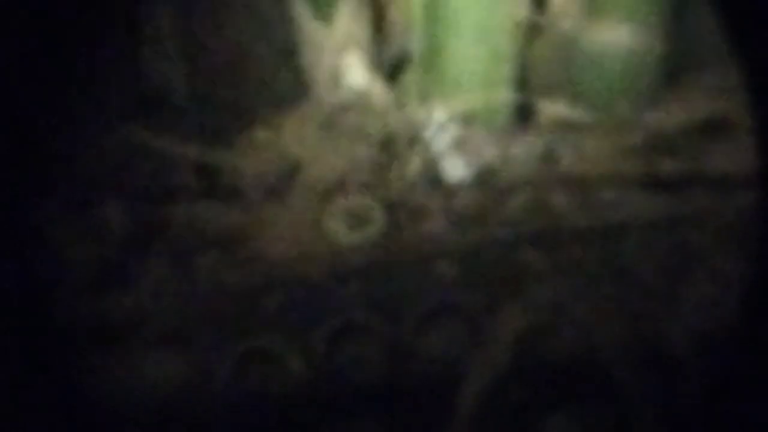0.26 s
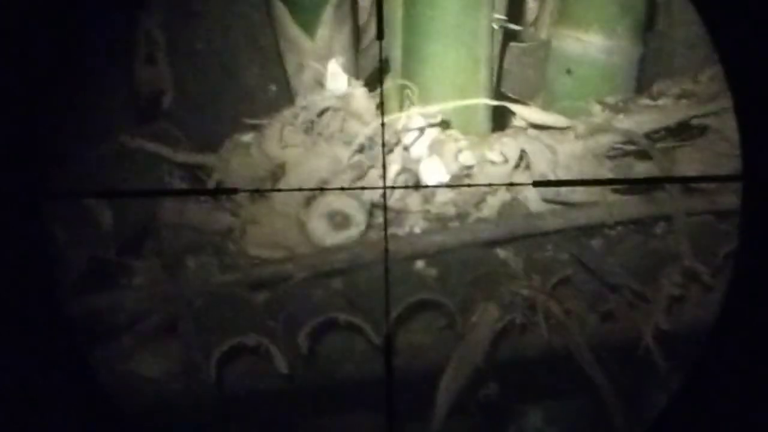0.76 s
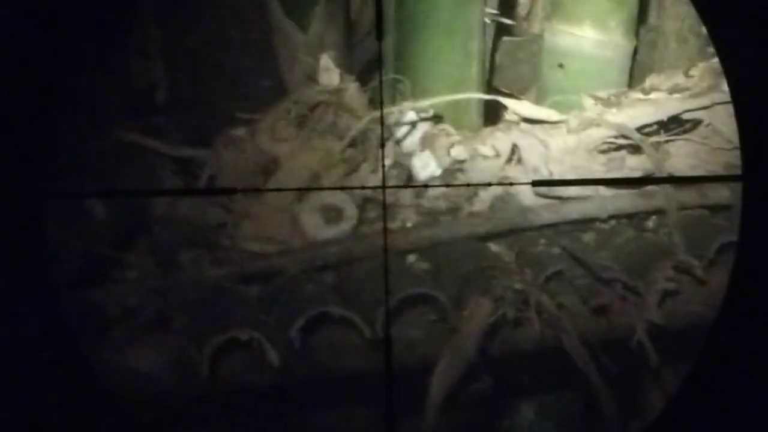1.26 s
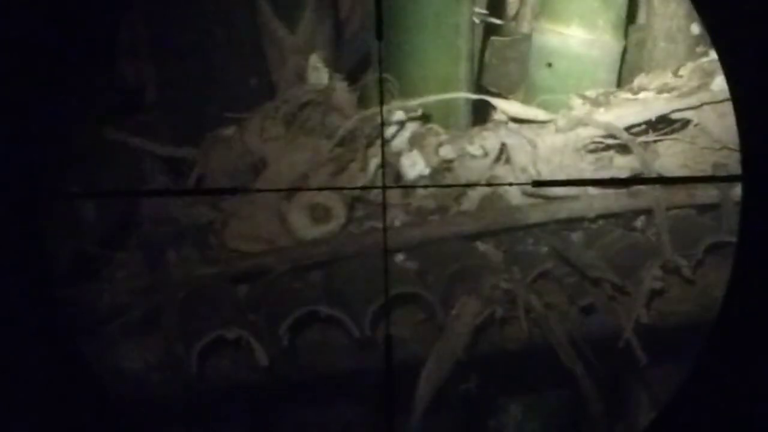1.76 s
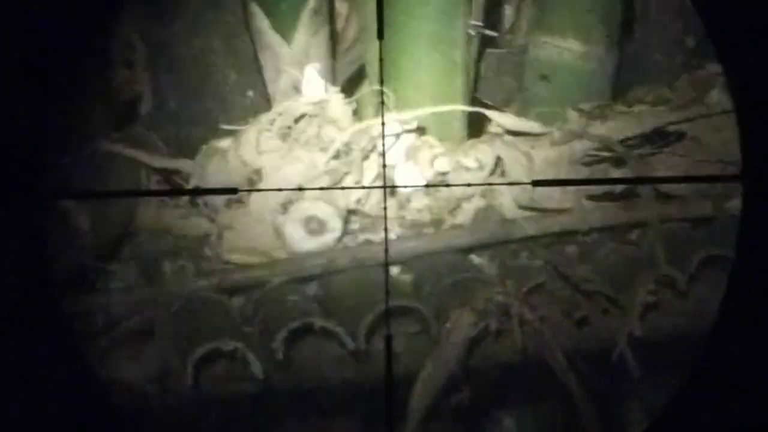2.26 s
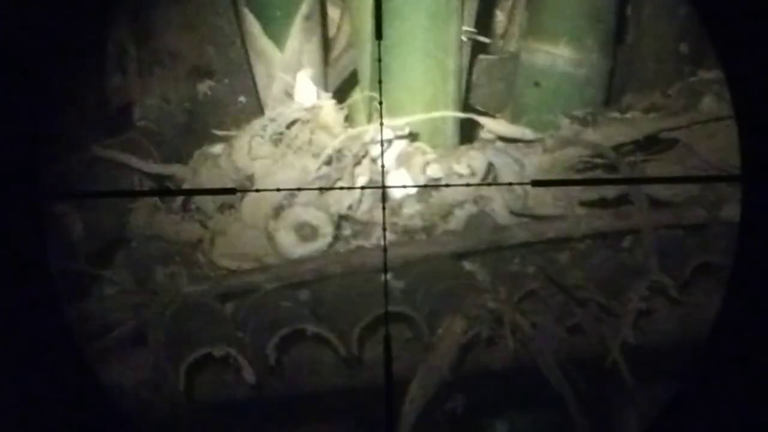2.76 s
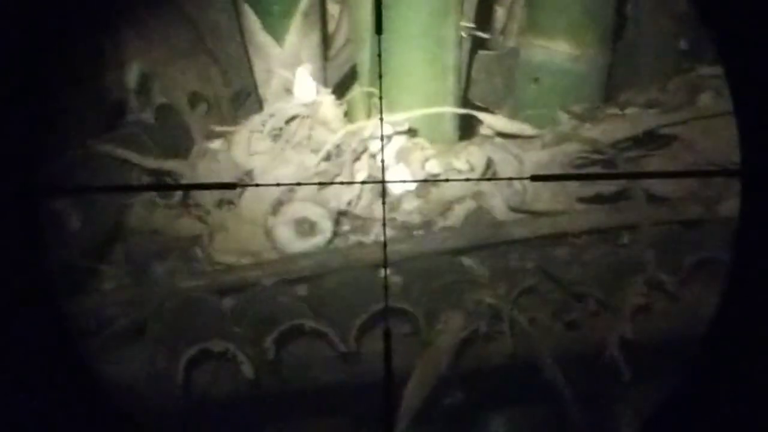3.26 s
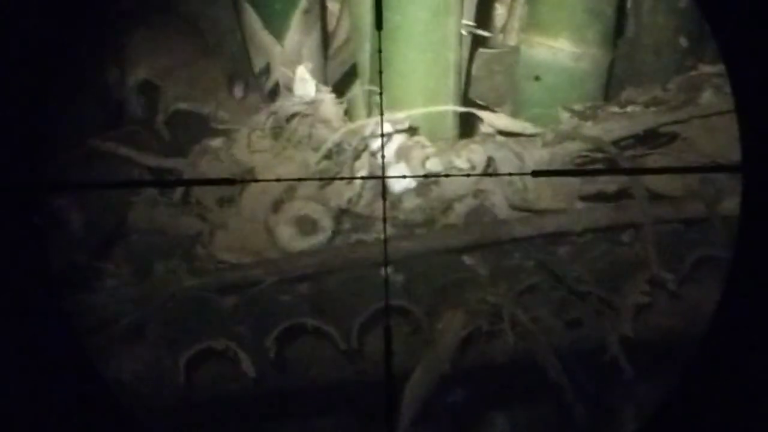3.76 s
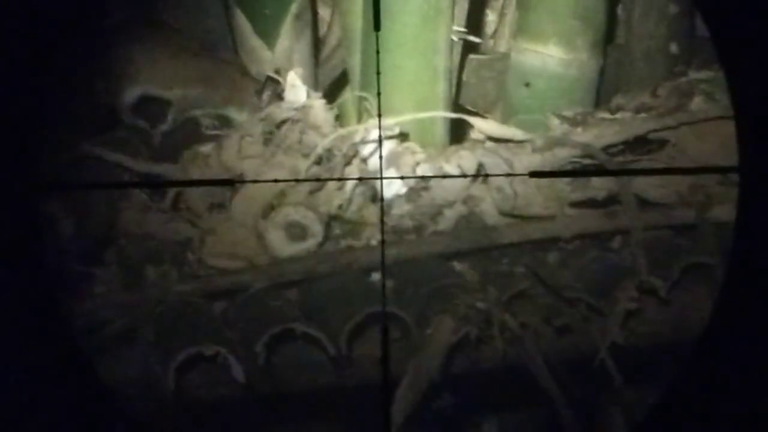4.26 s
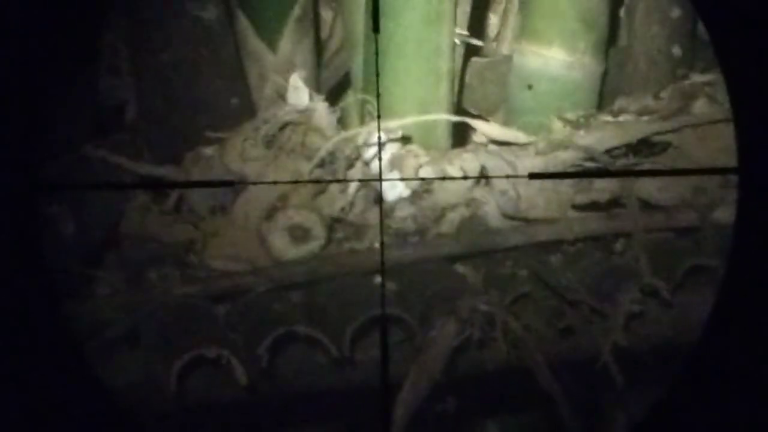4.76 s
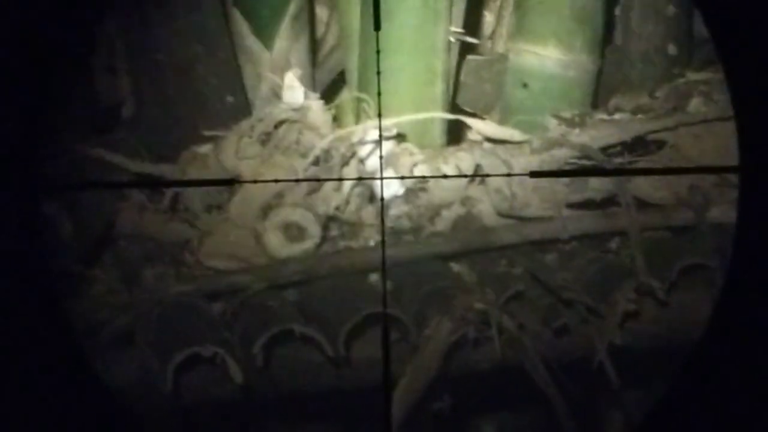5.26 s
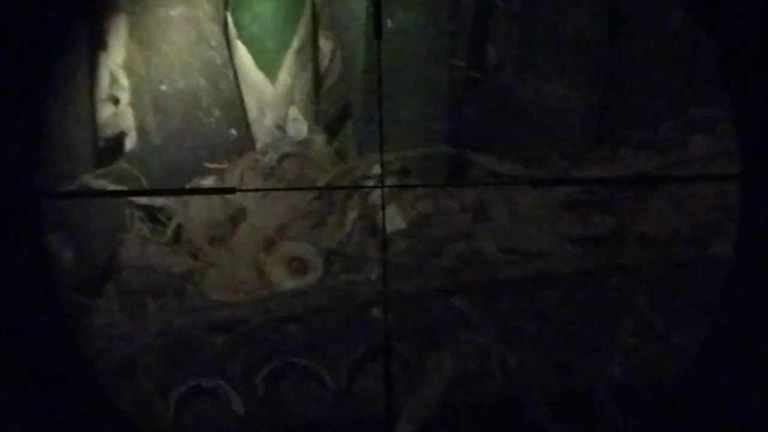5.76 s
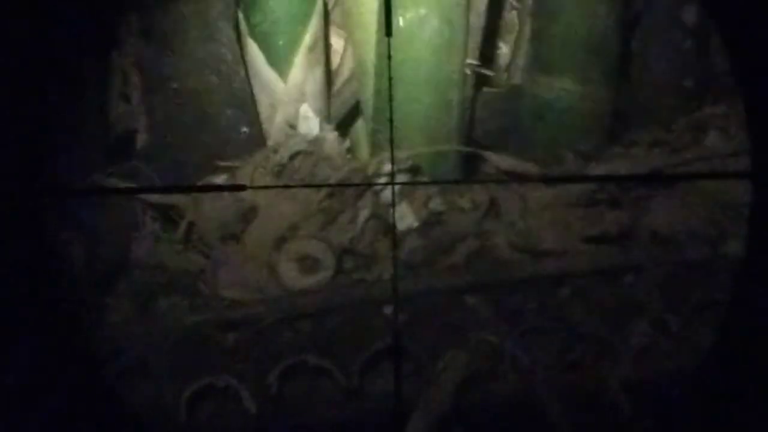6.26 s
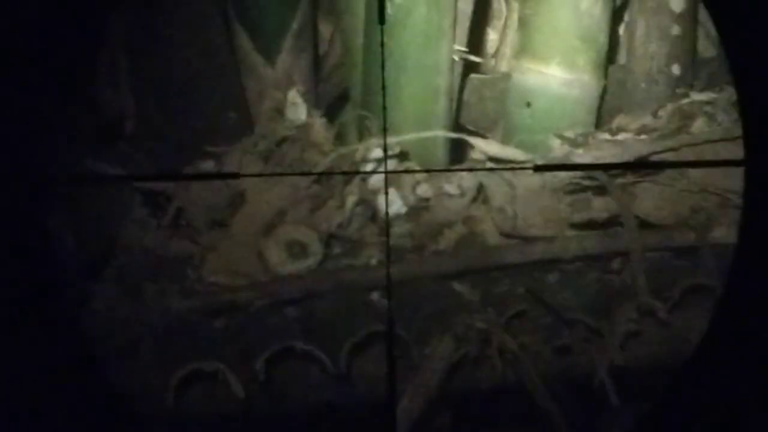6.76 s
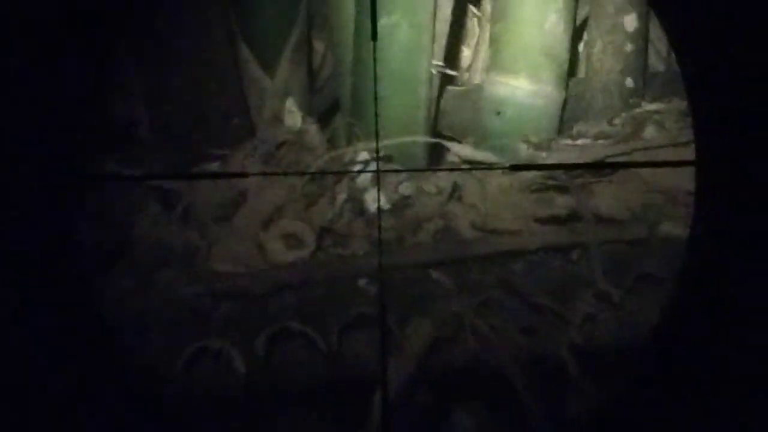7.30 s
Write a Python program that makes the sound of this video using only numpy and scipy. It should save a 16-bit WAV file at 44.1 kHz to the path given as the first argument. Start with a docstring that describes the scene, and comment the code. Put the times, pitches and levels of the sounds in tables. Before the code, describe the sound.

Night insects fill a still bamboo grove with a thin high buzz, quiet cricket trills and a far, pulsing chorus. Two nearby katydids rasp high and steadily over it, roughly twice a second, slipping in and out of step. Faint knocks occur close to the microphone early on. About three quarters through, an air gun gives one brief muffled pop, followed by another light knock as the chirping continues.

```python
"""Night in a bamboo grove. From the start, over still air, an insect's wing clicks sustain a thin high
buzz, crickets trill low and a far katydid chorus swells. A faint knock sounds close by; then two near
katydids rasp about twice a second, scraper on file, their wings now and then giving a brief lower ring.
The pair meet near 1.9 s and slowly fall out of step. A few more knocks come, the sharpest near 5.7 s,
a short muffled pop like an air-gun shot."""
import sys
import numpy as np
from scipy import signal
from scipy.fft import rfft, irfft
from scipy.io import wavfile

SR = 44100
rng = np.random.default_rng(int(sys.argv[2]) if len(sys.argv) > 2 else 0)


def put_to_file(sound):
    """Save the sound as 16-bit audio at rate SR, in the file named by the first command-line argument."""
    columns = np.atleast_2d(sound).T  # one column per channel
    safe = np.clip(columns, -1, 1)
    whole_steps = np.round(safe * 32767)
    wavfile.write(sys.argv[1], SR, whole_steps.astype(np.int16))


N = 332073
T = np.arange(N) / SR

def undb(db):
    """Amplitude ratio of a level in decibels."""
    return 10 ** (np.asarray(db) / 20)

def unit(x):
    """Normalisation to an rms of one."""
    return x / np.sqrt(np.mean(x ** 2))

def add(track, start_s, sound):
    """Superposition of a short sound on a track."""
    i = int(np.clip(start_s * SR, 0, N))
    track[i:i + len(sound)] += sound[:N - i]

def colour(x, spectrum, size=8192):
    """Minimum-phase filtering at unit power through (frequency [Hz], level [dB]) points."""
    hz, db = np.transpose(spectrum)
    bin_hz = np.arange(size // 2 + 1) * SR / size
    gain = undb(np.interp(np.log(bin_hz + 1), np.log(hz), db))
    cepstrum = irfft(np.log(gain))
    cepstrum[1:size // 2] *= 2
    cepstrum[size // 2 + 1:] = 0
    response = irfft(np.exp(rfft(cepstrum)))
    return signal.fftconvolve(x, response / np.linalg.norm(response))[:N]

def walk(rate):
    """Slow random modulation of unit rms, with rate new values a second."""
    return unit(np.interp(T * rate, np.arange(N), rng.standard_normal(N)))

def teeth(rate):
    """Shot noise: equal clicks at random times, as of a scraper catching file teeth."""
    caught = rng.random(N) < rate / SR
    return unit(caught * rng.choice([-1, 1], N))

def swell(t, hold_s, rise_db_per_s, fall_db_per_s):
    """Exponential growth and decay, in dB: the level rises until t = 0, holds, then falls."""
    return rise_db_per_s * np.minimum(t, 0) - fall_db_per_s * np.maximum(t - hold_s, 0)

def pip(hz, sag_hz, along):
    """Frequency glide: a sine sags in pitch while along runs from 0 to 1."""
    return np.sin(2 * np.pi * np.cumsum(hz + sag_hz * (.5 - along)) / SR)

def notes(table, length_s, sag_hz):
    """Tone bursts: each glide sounds under a half-sine envelope."""
    out, along = np.zeros(N), np.minimum(T[:SR // 30] / length_s, 1)
    for start, hz, db in table:
        add(out, start, undb(db) * np.sin(np.pi * along) * pip(hz, sag_hz, along))
    return out

# Background spectrum: (frequency [Hz], relative level [dB])
NIGHT_SPECTRUM = [(25, -49), (45, -27), (65, -23), (100, -11.5), (200, -16), (290, 0.5), (450, -2.5),
                  (700, -5), (1400, -8.5), (2600, -0.5), (3600, -3.5), (4700, 2), (6600, -4), (8600, -5),
                  (10500, -60), (15000, -40)]
def night_air():
    """Incoherent summation: still air and countless distant insects merge into coloured noise."""
    return undb(-63 + .8 * walk(7)) * colour(rng.standard_normal(N), NIGHT_SPECTRUM)

def high_buzz(centre_hz=7725, throb_s=.3225, crest_s=.243):
    """Resonance: dense wing clicks ring one high mode, louder and higher at each crest of a throb."""
    throb = np.cos(2 * np.pi * (T - crest_s) / throb_s)
    hz = centre_hz + 60.3 * throb + 44.87 * walk(12)
    sway_db = 1.5 * throb + 1.34 * walk(12)
    carrier = np.exp(2j * np.pi * np.cumsum(hz) / SR)
    out = np.zeros(N)
    for width_hz, db in [(690, -62), (104, -64)]:  # broad skirt, narrow core
        lowpass = signal.butter(3, width_hz / 2, fs=SR, output="sos")
        envelope = signal.sosfilt(lowpass, teeth(5000) + 1j * teeth(5000))
        out += undb(db + sway_db) * unit((envelope * carrier).real)
    return out

# One trill per cricket: (frequency [Hz], pulse rate [1/s], level [dB], unevenness [dB])
CRICKET_TRILLS = [(2483, 17, -67, 0.5), (2505, 37, -66, 3.5), (2576, 38.5, -70.5, 4)]
# Loudest pulses of the nearest cricket: (time [s], frequency [Hz], level [dB])
LOUD_PULSES = [(.747, 2525, -48.5), (1.658, 2455, -49.5), (1.83, 2490, -53), (2.314, 2487, -48.5),
               (2.457, 2490, -47.5), (3.997, 2503, -50), (4.58, 2515, -51), (5.624, 2500, -46.5),
               (7.096, 2460, -49), (7.302, 2510, -47.5)]
def crickets(pulse_s=.014, jitter=.09, waver_hz=32.06, phrase_db=1.23):
    """Amplitude modulation: nearly pure, wavering tones are cut into slightly uneven pulses."""
    out = np.zeros(N)
    pulse = np.sin(np.pi * np.minimum(T[:SR // 30] / pulse_s, 1))
    for hz, rate, db, uneven_db in CRICKET_TRILLS:
        envelope = np.zeros(N)
        slips, sizes = rng.standard_normal((320, 2)).T
        times = np.cumsum(1 + jitter * slips) / rate
        for start, size in zip(times - times[0], sizes):
            add(envelope, start, undb(uneven_db * min(size, 1.8)) * pulse)
        envelope *= undb(phrase_db * walk(5.5))
        tone = np.sin(2 * np.pi * np.cumsum(hz + waver_hz * walk(14)) / SR)
        out += undb(db) * unit(envelope * tone)
    return out + notes(LOUD_PULSES, length_s=.011, sag_hz=50)

# Chirps of the far katydids: (crest time [s], hold [s], relative level [dB])
CHORUS_CHIRPS = [(0, .01, -53), (0.315, 0.13, -40), (.92, 0.047, -37), (1.12, .14, -55.5),
                 (1.45, 0.071, -38), (1.69, .19, -53.5), (2.03, 0.04, -40), (2.23, 0.25, -53.5),
                 (2.55, 0.078, -40.5), (2.79, 0.19, -56), (3.09, 0.069, -40), (3.33, 0.025, -55),
                 (3.63, 0.11, -40.5), (4.17, 0.038, -41.5), (4.73, 0.074, -41), (5.27, 0.083, -41.5),
                 (5.81, 0.094, -41.5), (6.38, .07, -40.5), (6.92, .09, -41.5), (7.47, .07, -42)]
# Their spectrum: (frequency [Hz], relative level [dB])
CHORUS_SPECTRUM = [(1200, -44.5), (1950, -27), (2400, -5), (2900, -17), (3600, -16.5), (4350, -3),
                   (4700, 1), (5250, -5.5), (5900, -7), (6500, -11.5), (7400, -10.5), (8600, -27.5),
                   (11800, -53), (15300, -37.5)]
def far_chorus(scatter_lag_s=.17, flutter_db=1.28):
    """Addition of powers: far chirps and the near follower's scattered sound blur into one rasp."""
    scattered = [(start + scatter_lag_s, .1, db - 3) for start, db in FOLLOWER_CHIRPS]
    power = sum(undb(db + swell(T - crest, hold_s, rise_db_per_s=136.5, fall_db_per_s=137.5)) ** 2
                for crest, hold_s, db in list(CHORUS_CHIRPS) + scattered)
    rasp = teeth(4000) * np.sqrt(power) * undb(-7 + flutter_db * walk(110))
    return colour(rasp, CHORUS_SPECTRUM)

# Bands in which a blow's strength is given: (frequency [Hz])
BLOW_BANDS = [150, 430, 800, 1360, 3100]
# Blows: (time [s], then for each of the five bands a relative level [dB])
BLOWS = [(.050, -76, -76, -66, -54, -68), (.566, -83, -66, -61, -51.5, -61),
         (2.196, -88, -74, -62, -66, -80), (5.606, -73, -71, -57, -57, -68),
         (5.665, -71, -60, -54.5, -48, -63), (7.011, -75, -57.5, -60, -58, -59)]
# Modes of the struck body: (frequency [Hz], 60 dB decay time [s], gain [dB])
BODY_MODES = [(72.6, .25, -10), (105, .2, -9), (202, .12, -4.5), (435, 0.074, 3), (812, 0.024, 1.5),
              (1000, 0.013, 2.5), (1386, 0.02, 3), (1780, 0.028, -0.5), (2180, 0.02, 2), (3170, 0.024, 10)]
def knocks(attack_s=.00084):
    """Damped modal vibration: a blow gives a clack in the upper modes, a longer thud in the low ones."""
    out, t = np.zeros(N), T[:SR // 4]
    hz, t60, db = np.transpose(BODY_MODES)[:, :, None]
    for start, *blow_db in BLOWS:
        drive_db = np.interp(np.log(hz), np.log(BLOW_BANDS), blow_db)
        envelopes = undb(db + drive_db) * np.exp(-np.log(1000) * t / t60)
        ring = (envelopes * np.sin(2 * np.pi * (hz * t + rng.random(hz.shape)))).sum(0)
        add(out, start, ring * (1 - np.exp(-t / attack_s)))
    return out

def wing_strokes(count, stroke_s, hurry_s, attack_s, rest_hz, climb_hz, **envelope):
    """A chirp's pulse train, quicker at both ends: (lag [s], relative level [dB], frequency [Hz])."""
    along = np.linspace(0, 1, count)
    lag = np.arange(count) * stroke_s - hurry_s * (2 * along - 1) ** 3
    db = swell(lag - attack_s, **envelope)
    hz = rest_hz + climb_hz * np.sin(np.pi * along ** 1.55)  # an arch with a late crest
    return np.transpose([lag, db, hz])

def stridulate(chirps, strokes, wing, tooth_rate, bite_db, opening_db, uneven_db,
               tone_db, upper_db, sag_hz, spread_hz):
    """Stridulation: closing wings bite, drag on the file and ring a membrane; opening scrapes softly."""
    force, tone, t = np.zeros(N), np.zeros(N), T[:SR // 40]
    onset = np.tanh((t / .0005) ** 2)
    for start, chirp_db in chirps:
        for lag, db, hz in strokes:
            size, detune = rng.standard_normal(2)
            length_s = .0046 * np.exp(lag / .5)  # strokes lengthen through the chirp
            gain = undb(chirp_db + db + uneven_db * size)
            bite = undb(bite_db) * np.exp(-t / .00071)
            closing = gain * (1 + bite) / (1 + (t / length_s) ** 6)
            opening = gain * undb(opening_db) * np.exp(-((t - .013) / .0046) ** 2)
            add(force, start + lag, closing + opening)
            along = np.minimum(t / length_s, 2)
            pitch = hz + spread_hz * detune
            # the strongest strokes also excite a higher membrane mode
            upper = undb(upper_db + db) * pip(1.13 * pitch, sag_hz, along)
            add(tone, start + lag, closing * onset * (pip(pitch, sag_hz, along) + upper))
    return colour(force * teeth(tooth_rate), wing) + undb(tone_db) * tone

# Chirps of the leading katydid: (time [s], relative level [dB])
LEADER_CHIRPS = [(.128, -44.5), (.700, -45), (1.267, -44.5), (1.864, -41.5), (2.433, -40), (2.987, -41),
                 (3.536, -41.5), (4.084, -38.5), (4.625, -39.5), (5.170, -39), (5.713, -41), (6.283, -41),
                 (6.831, -40.5), (7.364, -39.5)]
# Its wing response: (frequency [Hz], relative level [dB])
LEADER_SPECTRUM = [(1200, -47), (1950, -20.5), (2350, -9), (2800, -12), (3700, -13.5), (4400, -1.5),
                   (4720, 1), (5200, -7), (6400, -8.5), (7400, -9.5), (8600, -28), (11800, -46.5),
                   (15300, -35.5)]
def leading_katydid():
    """Stridulation in ten strokes a chirp, swelling and dying away quickly."""
    strokes = wing_strokes(count=10, stroke_s=.0265, hurry_s=.003, rest_hz=4343, climb_hz=361,
                           attack_s=.0964, rise_db_per_s=116, hold_s=.057, fall_db_per_s=136)
    return stridulate(LEADER_CHIRPS, strokes, LEADER_SPECTRUM, tooth_rate=6500, bite_db=-4.5,
                      opening_db=-13, uneven_db=1.2, tone_db=4, upper_db=-13, sag_hz=122, spread_hz=65)

# Brief low rings of the near katydids' wings: (time [s], frequency [Hz], level [dB])
WING_RINGS = [(.155, 3830, -52), (2.147, 3860, -48), (2.458, 3750, -52), (4.406, 3900, -47)]
def wing_rings():
    """Resonance: a wing rings briefly below its main pitch, gliding slightly downward."""
    return notes(WING_RINGS, length_s=.01, sag_hz=80)

# Chirps of the following katydid: (time [s], relative level [dB])
FOLLOWER_CHIRPS = [(.233, -46.5), (.769, -48), (1.318, -49), (1.861, -43.5), (2.457, -44.5), (3.004, -43),
                   (3.573, -43), (4.120, -42.5), (4.708, -42.5), (5.276, -43), (5.855, -42.5), (6.424, -42),
                   (7.005, -42)]
# Its wing response: (frequency [Hz], relative level [dB])
FOLLOWER_SPECTRUM = [(1200, -50.5), (2000, -26), (2500, -4.5), (3300, -13), (4200, -16), (4750, 5.5),
                     (5100, -9), (5600, -2), (6500, -18), (7700, -30), (8800, -38), (11800, -49),
                     (15000, -40.5)]
def following_katydid():
    """Phase drift: a second stridulator catches up with the leader, then gradually falls behind."""
    strokes = wing_strokes(count=11, stroke_s=.0268, hurry_s=.004, rest_hz=4439, climb_hz=498,
                           attack_s=.112, rise_db_per_s=151, hold_s=.115, fall_db_per_s=71)
    return stridulate(FOLLOWER_CHIRPS, strokes, FOLLOWER_SPECTRUM, tooth_rate=6000, bite_db=-2.5,
                      opening_db=-15.5, uneven_db=.9, tone_db=5, upper_db=-9.5, sag_hz=158, spread_hz=53)

def grove(x, ground, wet_db, t60, echo_s=.004864):
    """Reflection and scattering: one ground bounce and a decaying tail from stems and leaves."""
    t = T[:SR // 2]
    envelope = np.exp(-np.log(1000) * t / t60) * (1 - np.exp(-t / .0064))
    tail = rng.standard_normal(len(t)) * envelope
    response = undb(wet_db) * tail / np.linalg.norm(tail)
    response[0] += 1
    response[int(echo_s * SR)] += ground
    return signal.fftconvolve(x, response)[:N]

def scene():
    """Superposition of the insects at their depths in the grove, the night air and the knocks."""
    leader, follower = leading_katydid(), following_katydid()
    near = grove(leader, ground=.25, wet_db=-3, t60=.2) + grove(follower, ground=.2, wet_db=-7, t60=.2)
    far = grove(far_chorus(), ground=.21, wet_db=-2.5, t60=.082)
    tones = grove(crickets() + wing_rings(), ground=0, wet_db=-3.5, t60=.25)
    return (undb(-4.5) * near + far + tones + high_buzz() + night_air() + knocks())[None]

def record(dry, cutoff_hz=15500):
    """Band limiting: a steep elliptic low-pass removes the highest treble."""
    return signal.sosfilt(signal.ellip(10, .1, 70, cutoff_hz, fs=SR, output="sos"), dry)

dry = scene()
out = record(dry)
put_to_file(out)
```